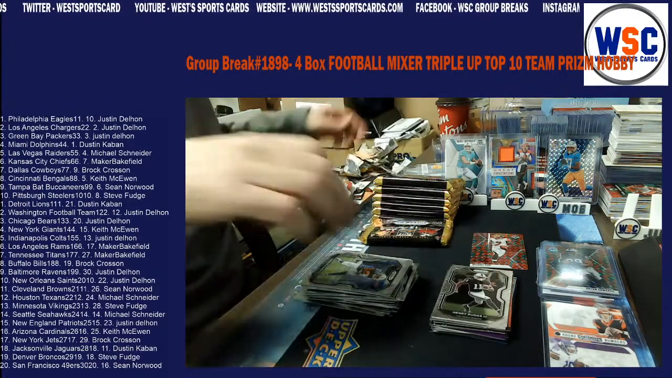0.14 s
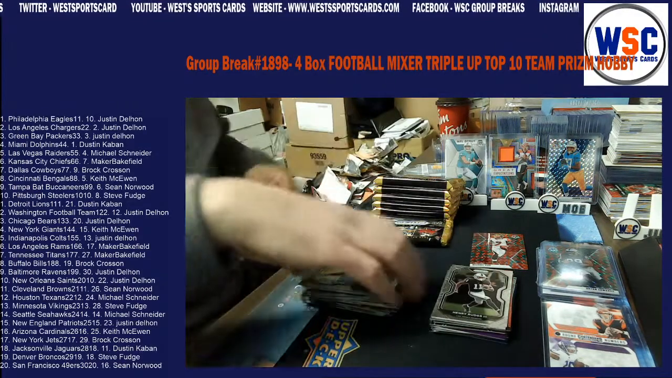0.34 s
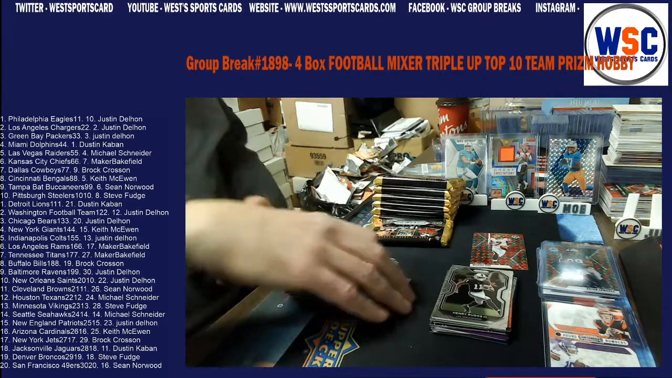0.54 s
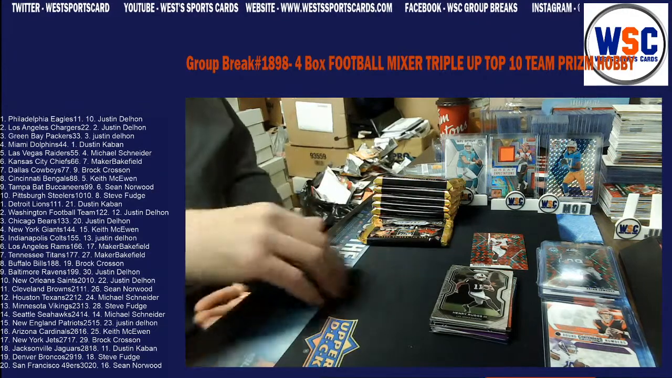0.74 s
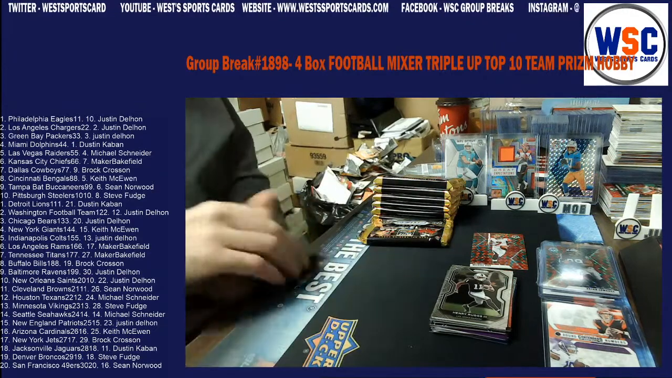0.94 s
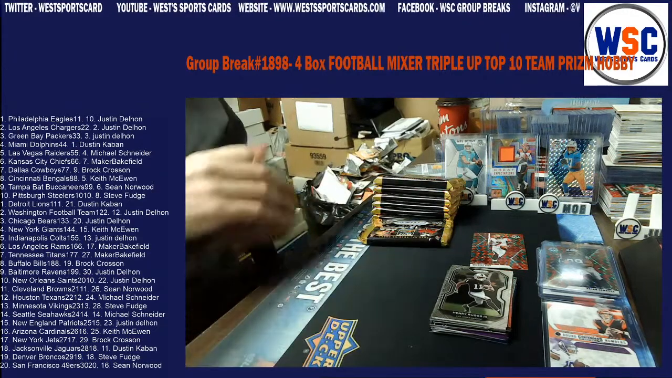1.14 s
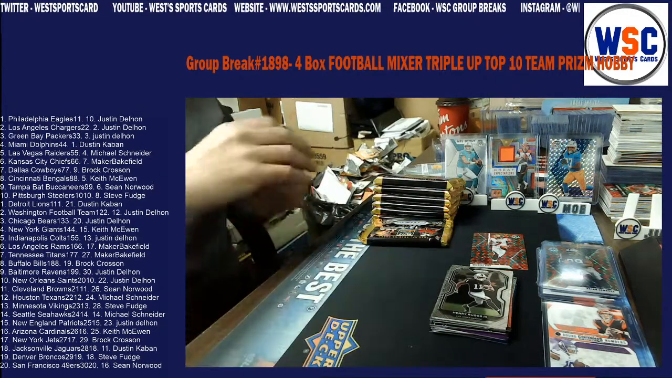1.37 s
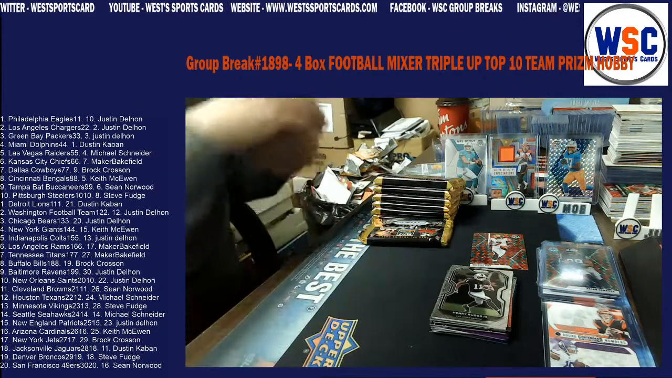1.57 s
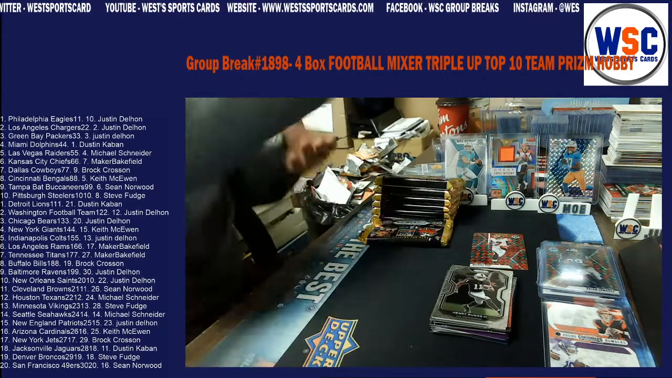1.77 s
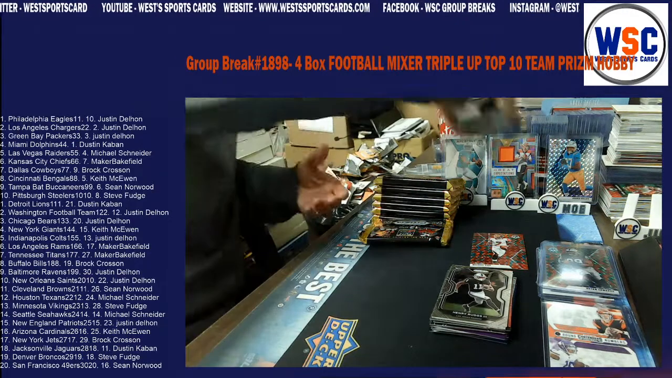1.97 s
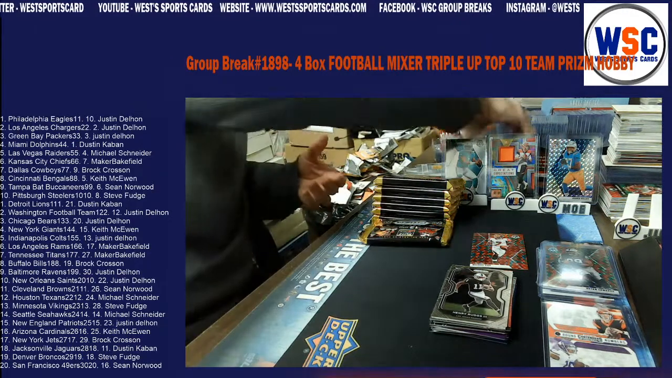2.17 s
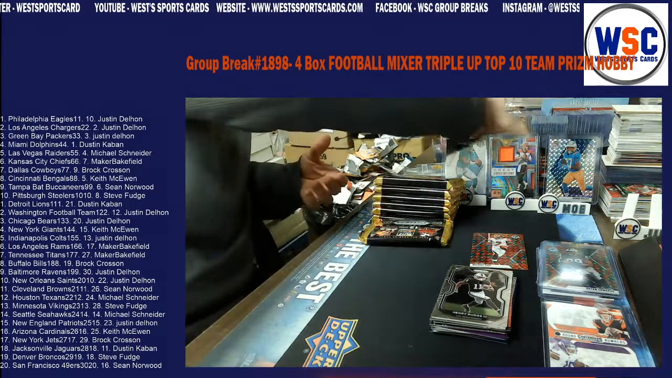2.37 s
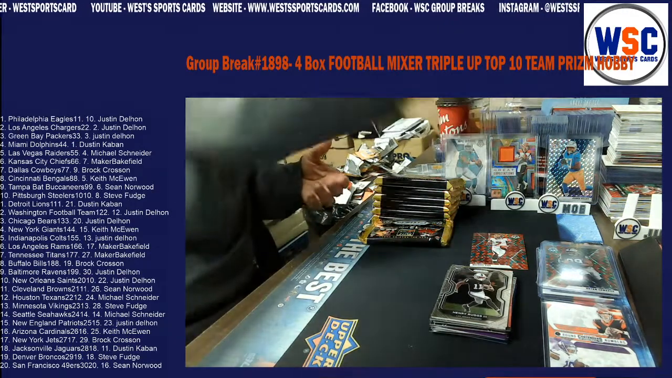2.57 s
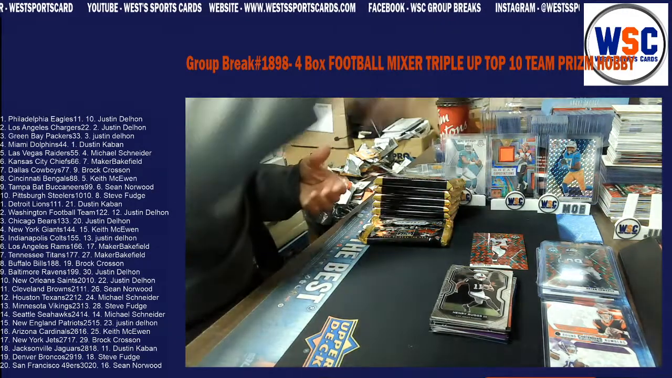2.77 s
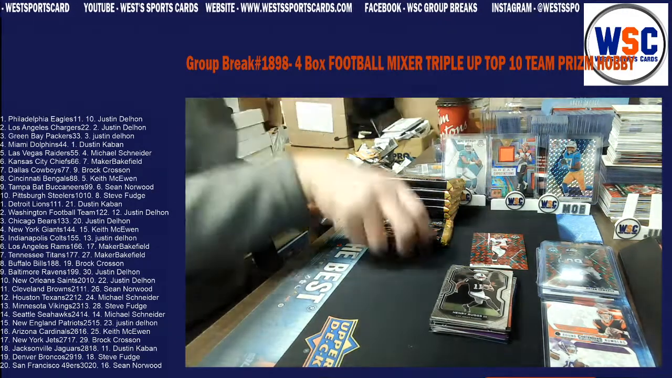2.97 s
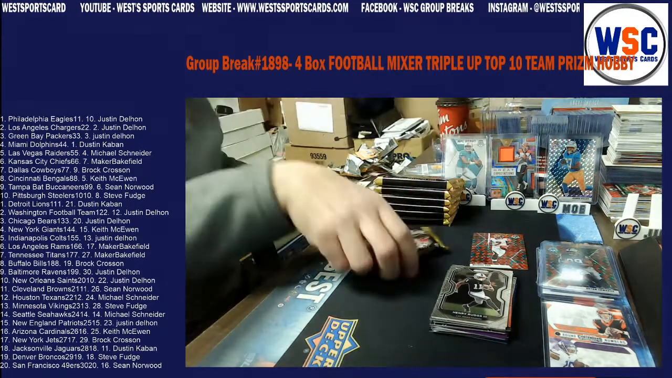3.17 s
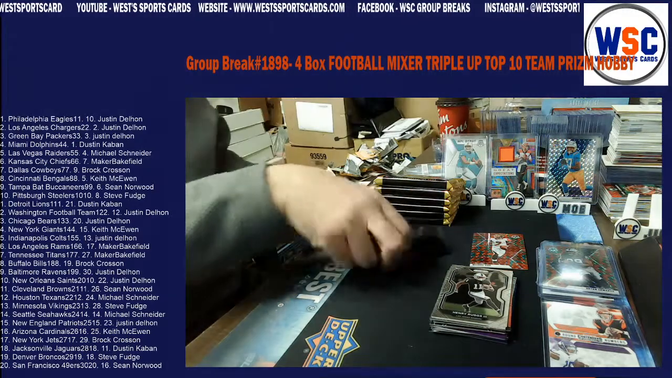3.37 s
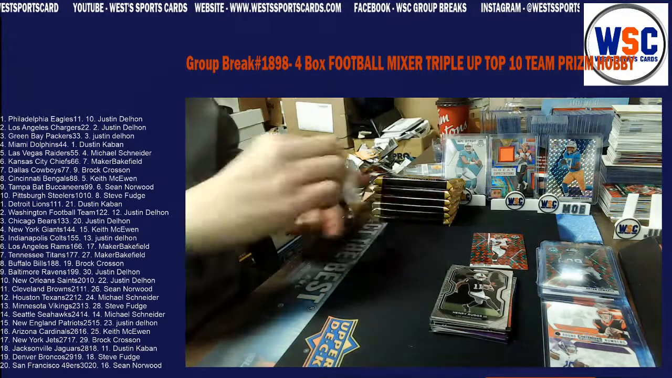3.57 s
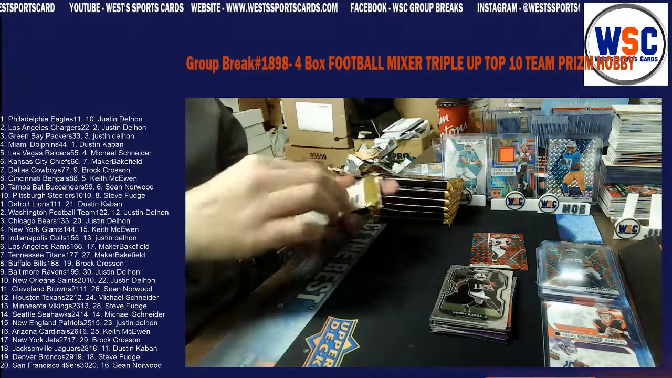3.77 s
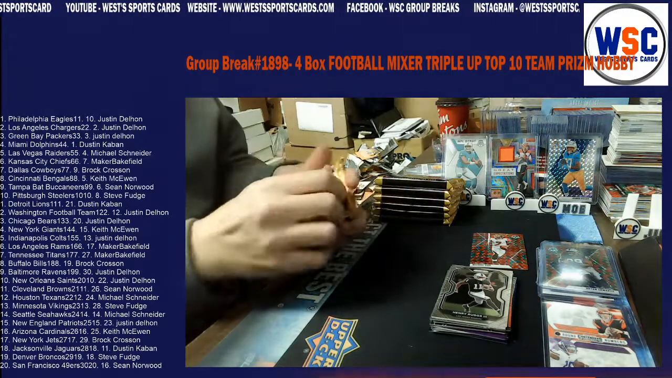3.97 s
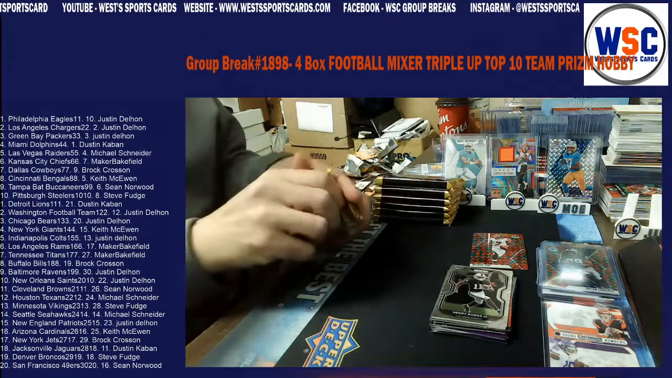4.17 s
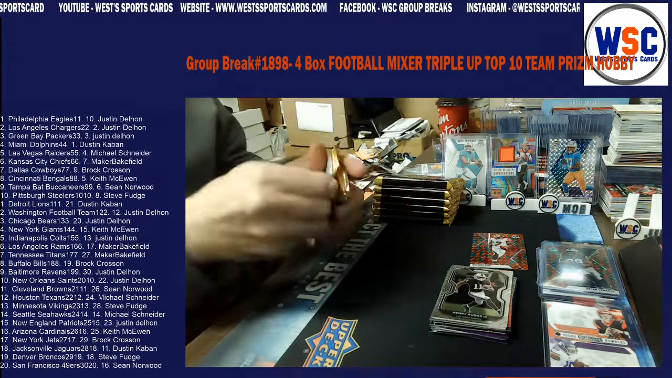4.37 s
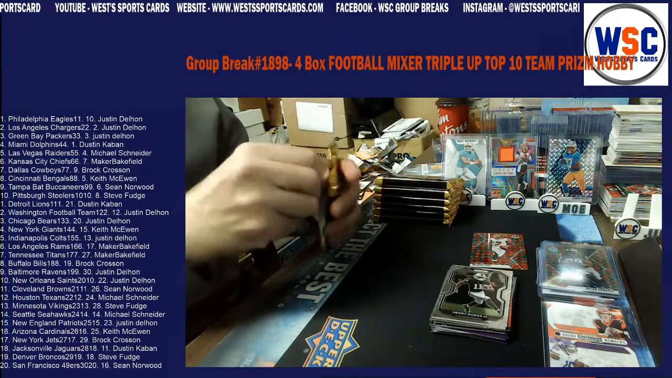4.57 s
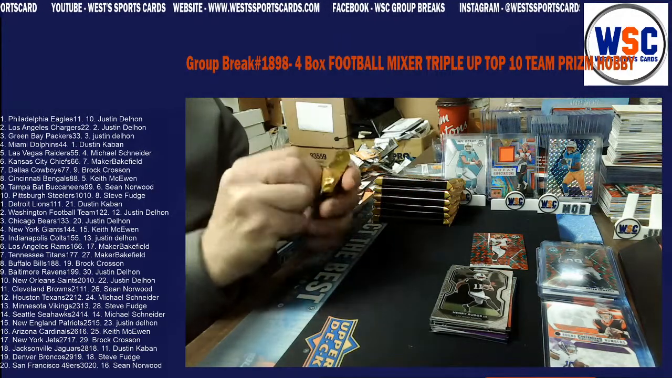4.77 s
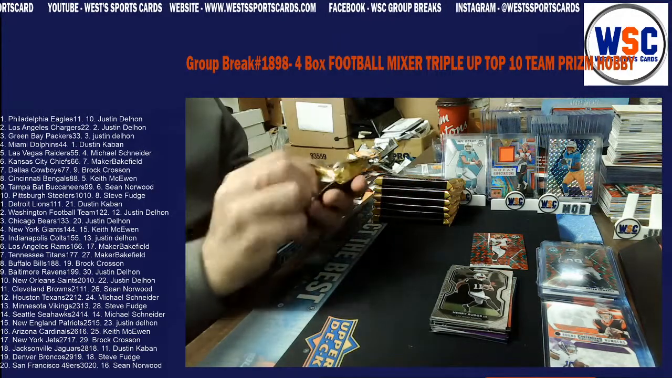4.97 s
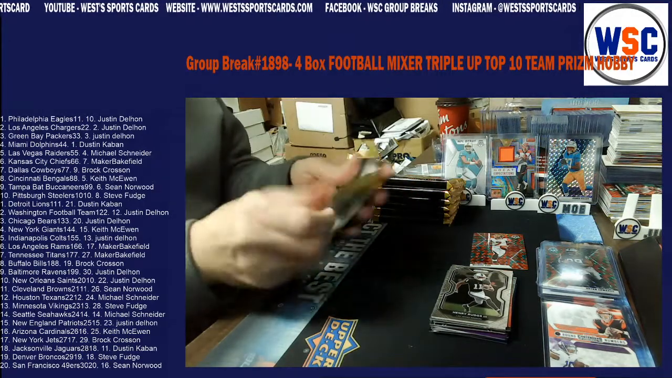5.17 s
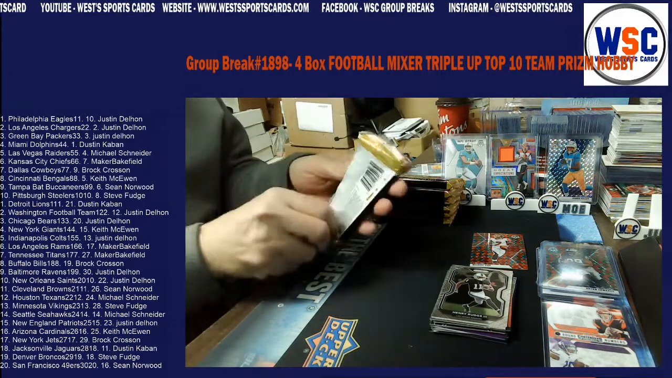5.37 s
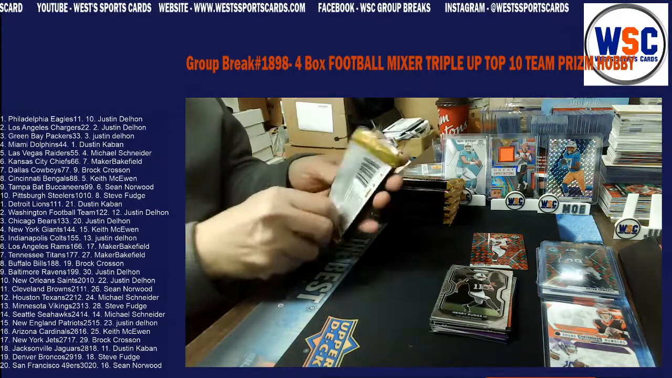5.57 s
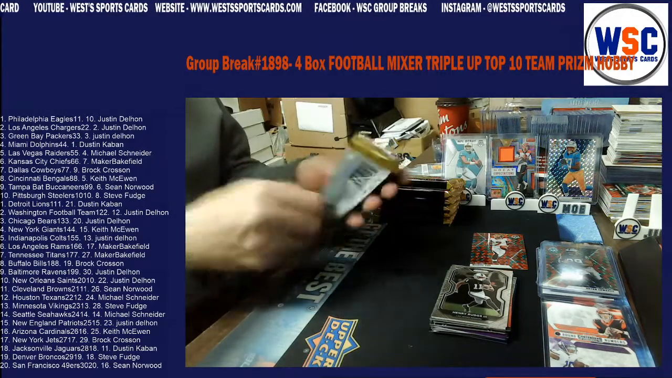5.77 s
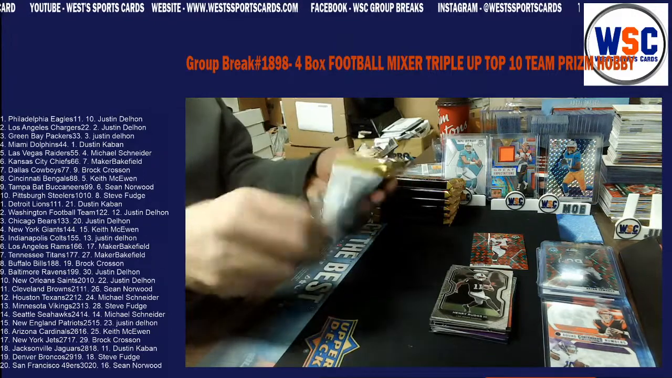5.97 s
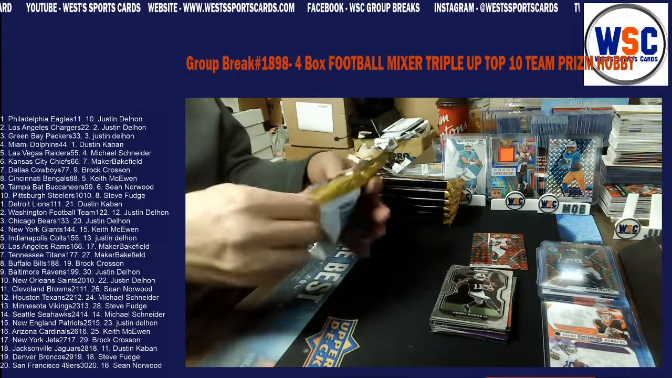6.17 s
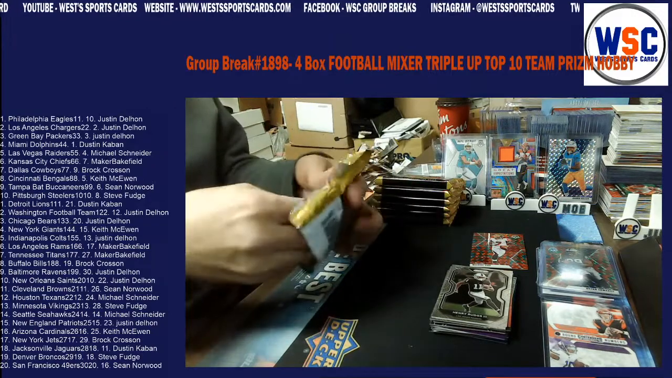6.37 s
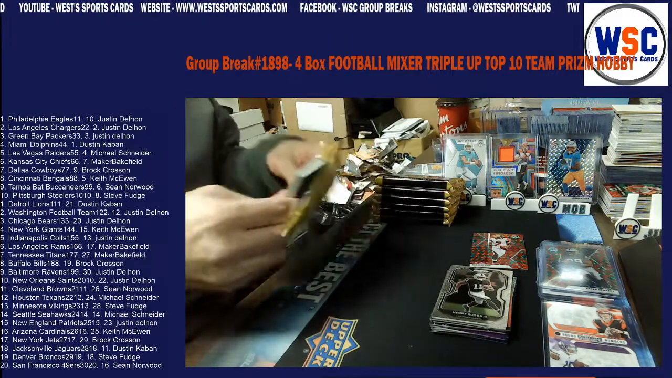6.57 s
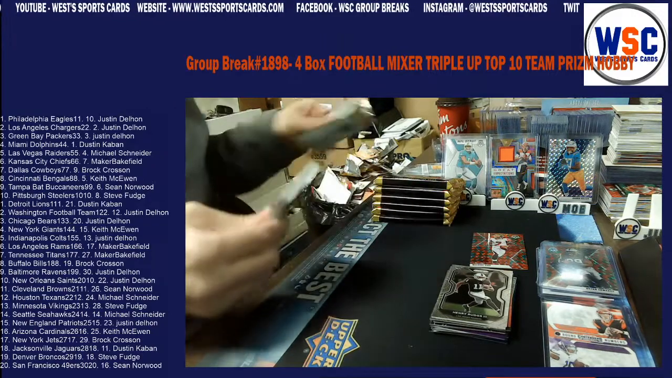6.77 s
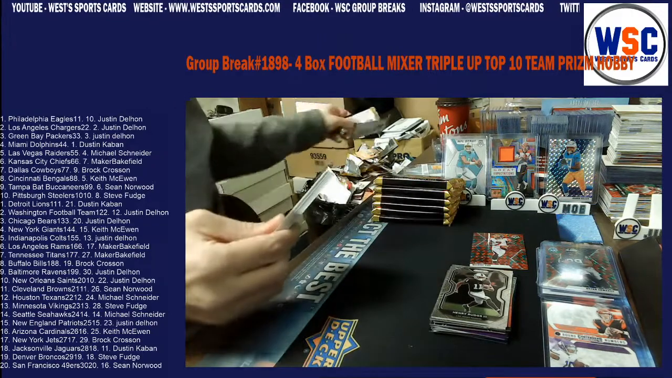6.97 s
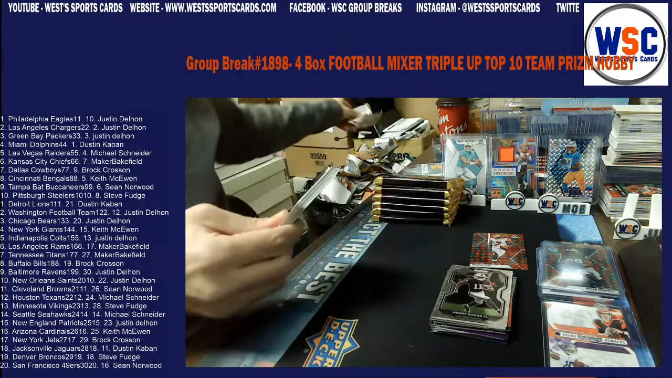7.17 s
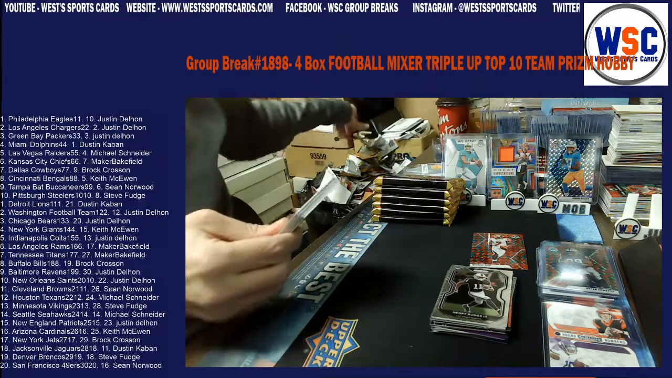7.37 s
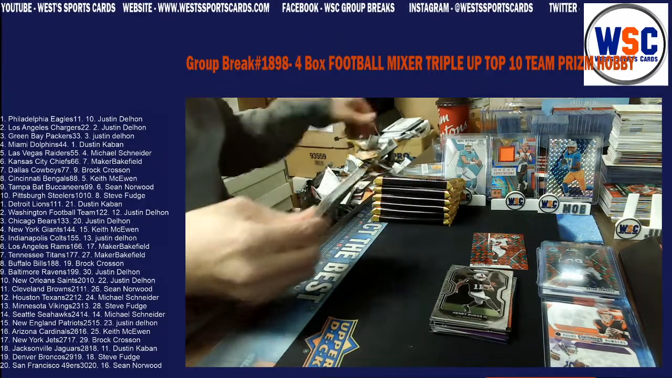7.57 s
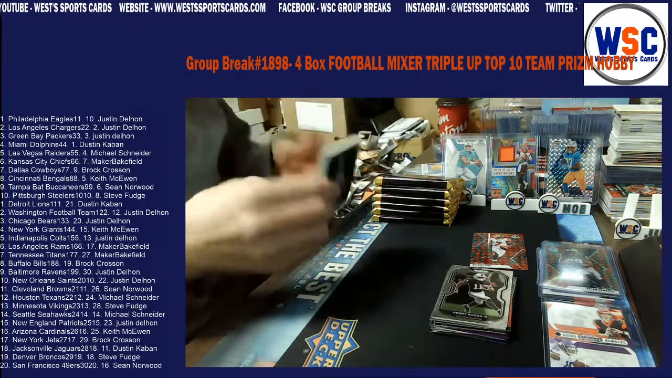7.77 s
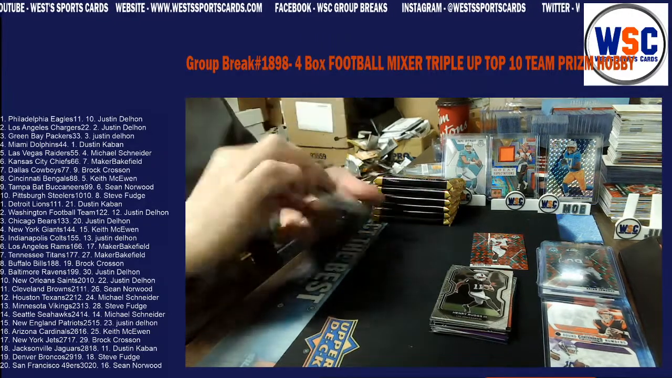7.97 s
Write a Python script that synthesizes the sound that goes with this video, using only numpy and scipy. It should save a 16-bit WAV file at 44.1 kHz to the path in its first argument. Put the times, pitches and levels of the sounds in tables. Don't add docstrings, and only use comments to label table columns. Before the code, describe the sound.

After a quiet start and one small thud, crisp foil crinkles, snaps and pops close by for several seconds, then fades to faint rustles over hum.

```python
import sys
import numpy as np
from scipy import signal
from scipy.fft import rfft, irfft
from scipy.io import wavfile

SR = 44100
rng = np.random.default_rng(int(sys.argv[2]) if len(sys.argv) > 2 else 0)


def transcribe(u):
    v = np.clip(np.atleast_2d(u).T, -1, 1)
    q = np.round(v * 32767).astype(np.int16)
    wavfile.write(sys.argv[1], SR, q)


def decibels_to_gain(level_db):
    exponent = np.asarray(level_db, float) / 20
    return 10 ** exponent


N = 353682


def rms_one(x):
    return x / np.sqrt(np.mean(x ** 2) + 1e-20)


def at_hz(points, hz):
    points = np.array(points)
    return np.interp(np.log(hz), np.log(points[:, 0]), points[:, 1])


def in_time(start_s, length_s, level_db, attack_s, release_t60_s):
    out, t = np.zeros(N), np.arange(N) / SR
    for start, hold, db in zip(start_s, length_s, level_db):
        span = slice(round(start * SR), round((start + hold + 1.5 * release_t60_s) * SR))
        swell = np.clip((t[span] - start) / attack_s, 0, 1) ** 2
        since_end = np.maximum(t[span] - start - hold, 0)
        out[span] += swell * decibels_to_gain(db - 60 * since_end / release_t60_s)
    return out


def wander(rate_hz):
    r = np.exp(-2 * np.pi * rate_hz / SR)
    return rms_one(signal.lfilter([1], [1, -2 * r, r * r], rng.standard_normal(N)))


def clicks(per_s, spread_db):
    sizes = decibels_to_gain(spread_db * np.minimum(rng.exponential(1, N), 3.0)) * rng.choice([-1, 1], N)
    return rms_one(sizes * (rng.random(N) < per_s / SR))


def causal_colour(spectrum):
    hz = np.maximum(np.fft.rfftfreq(2048, 1 / SR), 1)
    cepstrum = irfft(np.log(decibels_to_gain(at_hz(spectrum, hz))))
    cepstrum[1:1024] *= 2
    response = irfft(np.exp(rfft(cepstrum[:1024], 2048)))[:1024]
    return response / np.sqrt(np.sum(response ** 2))


# hz, level_db_per_hz
AIR = [(15, -37.5), (25, 6), (86, -1), (136, -15.5), (204, -19.5), (240, -26.5), (331, -35.5), (400, -30),
       (524, -28), (973, -36.5), (1270, -33), (1540, -39), (4050, -47), (7530, -43.5), (15600, -54)]
# centre_hz, width_hz, rms_db
FAN = [(17.44, 3.3, -40), (133.8, 11, -58), (345.5, 55, -61), (1259, 28, -74), (1076, 91, -74)]
# hz, share
LIKENESS = [(60, 0.98), (150, 0.9), (380, 0.83), (950, 0.33), (2380, 0.19), (5980, 0.18), (15000, 0.51)]
AIR_DB = -41.5


def room_hum():
    hz = np.maximum(np.fft.rfftfreq(N, 1 / SR), 1)
    mid, side = rfft(rng.standard_normal((2, N)))
    power = decibels_to_gain(at_hz(AIR, hz)) ** 2
    power *= decibels_to_gain(AIR_DB) ** 2 / np.mean(power)
    for centre_hz, width_hz, db in FAN:
        hump = 1 / (1 + (2 * (hz - centre_hz) / width_hz) ** 2) ** 2
        power += decibels_to_gain(db) ** 2 * hump / np.mean(hump)
    alike = np.clip(at_hz(LIKENESS, hz), 0, 1)
    pair = np.sqrt(1 + alike) * mid + np.sqrt(1 - alike) * side * np.array([[1], [-1]])
    return irfft(np.sqrt(power / (1 + alike)) * pair, N) * decibels_to_gain([[.4], [-.4]])


# start_s, length_s, rustle_db
BRUSH = [
    (.0, 0.58, -69),
    (0.484, 0.45, -60.5),
    (1.048, 0.4, -71.5),
    (1.6, 0.33, -74),
    (1.988, 0.4, -66.5),
    (6.693, 0.44, -67),
    (7.183, 0.1, -53.5),
    (7.605, 0.49, -68.5),
]
SWEEP_S, LIFT_T60_S = 0.097, 0.23


def brush_strength():
    return decibels_to_gain(-2.5) * in_time(*np.transpose(BRUSH), SWEEP_S, LIFT_T60_S)


# start_s, length_s, crinkle_db, body_db (relative to crinkle)
SQUEEZES = [(2.994, 0.072, -24.5, -12), (3.08, 0.096, -54, -42), (3.239, 0.1, -27, -5.5),
            (3.363, 0.058, -28, -9), (3.435, 0.054, -55, -13), (3.569, 0.053, -26.5, -8.5),
            (3.778, 0.058, -27, -9.5), (3.936, 0.033, -26.5, -15.5), (3.985, 0.16, -28, -12.5),
            (4.101, 0.096, -15, -15), (4.256, 0.11, -30.5, -13), (4.335, 0.032, -22.5, -12.5),
            (4.438, 0.11, -25, -14), (4.565, 0.16, -22, -15.5), (4.742, 0.039, -26, -20),
            (4.9, 0.065, -22.5, -10), (5.0, 0.18, -25, -11.5), (5.185, 0.085, -22, -10.5),
            (5.311, 0.044, -29.5, -13.5), (5.438, 0.077, -31.5, -11.5), (5.59, 0.13, -19.5, -20.5),
            (5.829, 0.18, -25.5, -9), (6.024, 0.083, -32, -5.5), (6.092, 0.037, -32.5, -3),
            (6.132, 0.15, -26.5, -14), (6.292, 0.068, -25.5, -12), (6.466, 0.098, -26.5, -9.5),
            (3.498, 0.027, -43, -5), (3.626, 0.066, -43, -13), (5.281, .03, -39, -10), (5.372, .06, -49, -7),
          (6.37, 0.027, -42.5, -5), (2.928, 0.069, -32.5, -5.5), (3.192, .035, -36, -3.5),
          (3.695, 0.07, -38.5, -7), (3.809, 0.12, -37.5, -8), (5.514, 0.056, -40, -9.5),
          (6.603, 0.071, -43.5, -6), (4.774, 0.092, -20.5, -11), (4.92, 0.047, -21.5, -11.5),
          (5.695, 0.086, -14, -9.5)]
PRESS_S, SETTLE_T60_S = 0.0094, 0.11


def grips():
    return np.transpose(sorted(map(tuple, SQUEEZES)))


def crinkle_strength(start_s, length_s, level_db, lumps):
    return in_time(start_s, length_s, level_db, PRESS_S, SETTLE_T60_S) * lumps


# start_s, peak_db, decay_t60_s, loudest_hz
PACK_CREASES = [(2.9976, -34, 0.15, 6580), (3.1, -13, 0.026, 5600), (3.2465, -33, 0.04, 6320),
                (3.272, -14, 0.022, 6200), (3.2889, -13, 0.024, 5940), (3.3074, -28, 0.045, 6040),
                (3.3286, -21.5, 0.018, 6150), (3.3615, -27.5, 0.081, 5010), (3.3912, -18.5, 0.051, 6530),
                (3.4104, -23, 0.066, 5700), (3.445, -16, 0.017, 6440), (3.4708, -15.5, 0.027, 7400),
                (3.488, -18.5, 0.037, 6000), (3.542, -34.5, 0.12, 5350), (3.5824, -20, 0.03, 6200),
                (3.6183, -16, 0.028, 4450), (3.716, -33.5, 0.067, 6910), (3.784, -9.5, 0.029, 6320),
                (3.8802, -31.5, 0.051, 5900), (3.913, -29, 0.027, 6710), (3.945, -28.5, 0.094, 6000),
                (3.9934, -19, 0.032, 5860), (4.0376, -28, 0.055, 4200), (4.0567, -31, 0.11, 6130),
                (4.1113, -23, 0.04, 6100), (4.1275, -20.5, 0.12, 6130), (4.164, -11.5, 0.059, 7150),
                (4.1874, -12.5, 0.039, 8100), (4.2353, -36, 0.021, 7180), (4.2662, -21, 0.023, 7500),
                (4.279, -22.5, 0.05, 6550), (4.3315, -33, 0.024, 6540), (4.3787, -15, 0.035, 6900),
        (4.402, -18, 0.032, 7550), (4.4424, -18, 0.028, 8260), (4.4645, -17.5, 0.026, 6070),
        (4.5017, -16.5, 0.029, 8500), (4.5266, -25, 0.09, 7040), (4.57, -15, 0.042, 7350),
        (4.5947, -17, 0.025, 5140), (4.6254, -11.5, 0.04, 6860), (4.6394, -7.5, 0.061, 6180),
        (4.6724, -14.5, 0.026, 5250), (4.6942, -9, 0.038, 5800), (4.7486, -25.5, 0.037, 7380),
        (4.771, -14, 0.038, 6710), (4.791, -7.5, 0.098, 6630), (4.907, -11, 0.081, 4650),
        (4.9352, -8, 0.1, 6400), (4.9509, -4, 0.027, 5870), (4.968, -4.5, 0.024, 5700),
        (4.9832, -7.5, 0.041, 6610), (5.0655, -19.5, 0.038, 5960), (5.1223, -21, 0.047, 7280),
        (5.1387, -13.5, 0.052, 5970), (5.21, -7.5, 0.039, 6230), (5.2318, -19, 0.028, 5250),
        (5.2595, -27.5, 0.019, 6140), (5.3198, -36, 0.048, 5560), (5.3674, -23.5, 0.029, 6230),
                (5.4661, -21.5, 0.035, 6900), (5.4869, -13, 0.022, 6520), (5.6087, -28, 0.094, 5990),
            (5.6393, -10, 0.029, 7100), (5.67, -14, 0.013, 6660), (5.6818, 0, 0.041, 8000),
            (5.7035, -10, 0.047, 5960), (5.7422, -15.5, 0.11, 6160), (5.7723, -6.5, 0.034, 6100),
            (5.8457, -18.5, 0.046, 6290), (5.8865, -5.5, 0.025, 6800), (5.911, -11.5, 0.015, 6870),
            (5.9224, -2, 0.026, 6810), (5.988, -26, 0.042, 6140), (6.0008, -22.5, 0.036, 6150),
            (6.0344, -22, 0.047, 5930), (6.0692, -19, 0.047, 5240), (6.11, -30, 0.022, 5430),
            (6.1566, -15, 0.044, 5400), (6.1794, -10.5, 0.036, 6760), (6.213, -17, 0.044, 6360),
            (6.2696, -29, 0.056, 6800), (6.3038, -2.5, 0.022, 7160), (6.334, -29, 0.032, 6670),
            (6.355, -18, 0.012, 6050), (6.4795, -27.5, 0.059, 5060), (6.4948, -22.5, 0.087, 6600),
            (6.5248, -26, 0.028, 6240), (6.5575, -25, 0.035, 8000), (6.6453, -37.5, 0.036, 6490)]
# start_s, peak_db, decay_t60_s, loudest_hz
TICKS = [(0.2803, -52, 0.076, 5420), (0.3596, -48, 0.063, 6880), (0.4084, -42.5, 0.1, 5040),
         (0.437, -42, 0.074, 4300), (0.9234, -59, 0.06, 7090), (1.1129, -53, 0.06, 7400),
         (1.2584, -56, 0.092, 6320), (1.3684, -57, 0.17, 5600), (1.3984, -58, 0.068, 3310),
         (2.7462, -54, 0.06, 4580), (2.8459, -50, 0.049, 4070), (6.935, -43.5, 0.071, 5140),
         (7.0638, -48, 0.052, 7680), (7.115, -45.5, 0.087, 5460), (7.237, -44, 0.16, 5340),
         (7.2908, -33.5, 0.05, 8590), (7.4145, -53.5, 0.042, 3170), (7.5484, -52, 0.052, 4610),
         (7.6814, -59, 0.06, 4880), (7.9122, -48.5, 0.076, 6970)]
# start_s, peak_db, decay_t60_s, loudest_hz
SLAPS = [
    (2.275, -38.5, 0.024, 3080),
    (2.2958, -24, 0.029, 3080),
    (2.3294, -55, 0.03, 5230),
]
# start_s, peak_db, decay_t60_s, loudest_hz, left_right_db
MORE_CREASES = [(0.2954, -51, 0.03, 5710, 1.0), (0.4964, -52, 0.03, 3230, 1.0), (3.2354, -29, 0.03, 6100, 1.0),
                (3.598, -20, 0.03, 6790, 1.5), (3.7304, -37, 0.03, 5410, 1), (4.749, -13, 0.028, 6700, -3),
                (4.8054, -8, 0.03, 6170, 2.5), (4.828, -16, 0.03, 6240, 0), (4.918, -13, 0.03, 7570, -1.5),
                (4.996, -18.5, 0.03, 6300, 3), (5.044, -21, 0.03, 5780, 1), (5.0908, -27, 0.03, 5970, 1),
                (5.2016, -8.5, 0.03, 6200, 1), (5.2744, -23, 0.03, 5290, -1.0), (5.3336, -22, 0.03, 5940, -3),
                (5.5662, -39.5, 0.03, 6140, 1.0), (5.6146, -16.5, 0.03, 6030, -3.5), (5.622, -9, 0.03, 7320, -2),
                (5.692, -4.5, 0.03, 7120, 0.5), (5.718, -8.5, 0.035, 5080, 1), (5.7643, -8, 0.03, 6370, -1),
                (5.8296, -21.5, 0.03, 6470, -0.5), (5.8706, -12, 0.024, 6550, 0.5), (6.515, -18, 0.03, 5060, 0.5),
                (6.568, -15, 0.035, 4610, 0), (6.5994, -36, 0.03, 6590, 1.0), (7.0874, -41, 0.028, 5540, 3)]
CREASES = PACK_CREASES
EDGES_HZ = 140 * 2 ** np.arange(0, 7, .4)
SKIN = np.clip(np.log2(EDGES_HZ[1:] / 2000), 0, 1)
SWELL_S = 0.0018
TICK_BODY_DB, SLAP_BODY_DB = -7, 11
FOCUS_DB = 7.0


def snap_strength(start_s, body_db):
    fine = np.array(MORE_CREASES)

    def held_body(times_s):
        return body_db[np.searchsorted(start_s, np.array(times_s) + .01) - 1]

    bodies_db = [*held_body([row[0] for row in CREASES]), *[TICK_BODY_DB] * len(TICKS),
                 *[SLAP_BODY_DB] * len(SLAPS)]
    pans = [*rng.standard_normal(len(bodies_db)), *fine[:, 4] / 6]
    bodies_db = np.array([*bodies_db, *held_body(fine[:, 0])]) + 15.5
    events = [*CREASES, *TICKS, *SLAPS, *fine[:, :4] - [0, 2, 0, -1]]

    hz = np.sqrt(EDGES_HZ[1:] * EDGES_HZ[:-1])
    shapes = np.zeros((2, len(hz), N + 4000), "f4")
    t = np.arange(4000) / SR
    for (start, db, t60_s, top_hz), under_db, pan in zip(events, bodies_db, pans):
        at = max(round((start - SWELL_S) * SR), 0)
        side = decibels_to_gain(db + 2.84 * pan * np.array([1, -1]))[:, None, None]
        skin_db = FOCUS_DB * (np.abs(np.log2(hz / 6500)) - np.abs(np.log2(hz / top_hz)))
        patch = decibels_to_gain((1 - SKIN) * under_db + SKIN * skin_db)
        fade = np.minimum(t / SWELL_S, 1) * decibels_to_gain(-60 * t / max(t60_s, .01))
        shapes[:, :, at:at + 4000] += side * patch[:, None] * fade
    return shapes[..., :N]


GIVE_S, GIVE_DB = 0.0014, 14


def foil_clicks():
    shared = clicks(5000, spread_db=5.5)
    give = ((np.array([row[0] for row in [*CREASES, *MORE_CREASES]]) + GIVE_S) * SR).astype(int)
    shared[give] = decibels_to_gain(GIVE_DB)
    shared = np.array([np.roll(shared, 1), shared])
    own = np.array([clicks(7000, spread_db=6.0) for side in range(2)])
    own[0, give + 5] = decibels_to_gain(GIVE_DB)
    own[1, give + 9] = -decibels_to_gain(GIVE_DB)
    return shared, own


# hz, level_db_per_hz
FOIL = [(150, -57), (250, -27.5), (450, -21), (720, -16), (914, -18.5), (1090, -13), (1410, -16.5),
        (6340, 5.5), (9110, -3), (15600, -34.5)]


def foil():
    start_s, length_s, effort_db, body_db = grips()
    snaps = snap_strength(start_s, body_db)
    lumps = decibels_to_gain(2.68 * wander(57))
    crinkle = crinkle_strength(start_s, length_s, effort_db - 18.5, lumps)
    heave = crinkle_strength(start_s, length_s, effort_db + body_db + 2.5, lumps)
    brush = brush_strength()
    shared, own = foil_clicks()
    out = np.zeros((2, N))
    for k, (low_hz, high_hz) in enumerate(zip(EDGES_HZ, EDGES_HZ[1:])):
        alike = 1 / (1 + (high_hz / 2400) ** 4.3) * .55 + .45
        drive = np.sqrt(alike) * shared + np.sqrt(1 - alike) * own
        under = heave ** (1 - SKIN[k]) * crinkle ** SKIN[k]
        under *= decibels_to_gain((2.0 + 1.7 * SKIN[k]) * wander(19.7))
        under += brush * decibels_to_gain(0.73 * np.log2(high_hz / 8000) + 0.5 * wander(12))
        band = signal.butter(2, [low_hz, high_hz], "band", fs=SR, output="sos")
        strength = decibels_to_gain(-8.0) * snaps[:, k] + under
        out += (-1) ** k * signal.sosfilt(band, drive * strength + 1e-18)
    shaded = signal.lfilter([1, .35], [1.35], out[0])
    return signal.oaconvolve([shaded, out[1]], causal_colour(FOIL)[None], axes=1)[:, :N]


# start_s, length_s, pitch_hz, level_db
SQUEAKS = [
    (0.125, .05, 5500, -67),
    (0.15, .04, 9400, -68),
    (6.72, 0.18, 3500, -76),
    (6.826, 0.11, 7050, -73),
    (6.92, 0.19, 3420, -74),
    (7.168, .06, 5600, -73),
    (7.303, .04, 8540, -55.5),
    (7.34, .03, 6250, -69),
]


def squeaks():
    out, t = np.zeros(N), np.arange(N) / SR
    waver = 1.5 * np.sin(2 * np.pi * 35 * t)
    for start_s, length_s, pitch_hz, db in SQUEAKS:
        through = np.clip((t - start_s) / length_s, 0, 1)
        out += decibels_to_gain(db) * np.sin(np.pi * through) * np.sin(2 * np.pi * pitch_hz * t + waver)
    return out


def ring(push, hz, t60_s):
    r, w = decibels_to_gain(-60 / (t60_s * SR)), 2 * np.pi * hz / SR
    return signal.lfilter([0, np.sin(w)], [1, -2 * r * np.cos(w), r * r], push + 1e-18)


# start_s, level_db, contact_s, push_to_roughness
THUDS = [(0.618, -72.5, 0.044, .1), (0.637, -64.5, 0.032, 0.12), (0.665, -64.5, 0.02, 0.18),
         (0.676, -71, 0.011, 0.9), (0.696, -74, .01, 1.5), (2.28, -73, .004, 0.57),
         (2.291, -51, 0.0091, 0.54), (2.296, -53, 0.0032, 0.52), (2.301, -46, 0.0027, 1.76),
         (2.307, -62, 0.0035, 1.3), (2.949, -65, 0.0096, 0.23), (5.738, -58, 0.014, 0.18),
         (5.768, -53, 0.0095, .2), (5.915, -54, 0.0053, 0.4), (6.179, -61.5, 0.014, 0.47)]
# pitch_hz, level_db, decay_t60_s
TABLE = [(59, -2.5, 0.13), (110, -8.5, 0.072), (180, 2.5, 0.028), (317, -7.5, 0.045), (508, 3, 0.013),
         (758, -0.5, 0.024), (1220, 12.5, 0.0017), (1820, 7.5, 0.0017), (3120, -1, 0.0016)]


def thuds():
    out, grit = np.zeros(N), rng.standard_normal((len(TABLE), N))
    rough, steady = np.zeros((2, N))
    for start_s, db, contact_s, weight in THUDS:
        at = round(start_s * SR)
        t = np.arange(round(3 * contact_s * SR)) / SR
        push = decibels_to_gain(db) * np.exp(-2 * t / contact_s)
        rough[at:at + len(t)] += push
        steady[at:at + len(t)] += weight * decibels_to_gain(-8.5) * push
    for (hz, db, t60_s), noise in zip(TABLE, grit):
        out += decibels_to_gain(db) * ring(rough * noise + steady, hz, t60_s)
    return signal.sosfilt(signal.butter(2, [70, 4500], "band", fs=SR, output="sos"), out)


# start_s, peak_db, pitch_hz
POPS = [(3.246, -20.5, 1760), (3.306, -19, 1140), (3.581, -24.5, 1030), (3.783, -47, 2330),
        (4.058, -16.5, 2000), (4.374, -25, 710), (4.402, -16.5, 1830), (4.441, -35, 2500),
        (4.571, -10, 2500), (4.631, -12.5, 2070), (4.693, -26.5, 1990), (4.728, -29.5, 2380),
        (4.793, -8, 1950), (4.861, -11.5, 2260), (4.907, -7, 2430), (5.366, -22.5, 2400),
        (5.773, -8.5, 1080), (5.847, -17.5, 2100), (5.888, -36, 1710), (5.921, -20, 1020),
        (6.035, -21, 1740), (6.069, -16.5, 2170), (6.18, -24.5, 1040), (6.303, -14.5, 1980),
        (0.626, -32, 1300), (0.632, -37, 780), (0.644, -30.5, 800), (2.2755, -38, 2050),
          (0.655, -44, 620), (3.289, -30, 1150), (3.785, -38, 730), (4.115, -36, 820), (4.48, -33, 724),
          (4.643, -7.5, 6520), (4.773, -33, 677), (4.905, -21, 793), (4.935, -21, 1090),
          (4.949, -19.5, 689), (4.975, -21.5, 1066), (4.92, -27, 880), (4.962, -24, 680), (4.985, -28, 458),
          (5.14, -31, 700), (5.217, -31, 760), (5.62, -38, 830), (5.683, 0, 7840), (5.683, 1.5, 8940),
          (5.686, -26.5, 498), (5.718, -22.5, 1070), (5.744, -26, 720), (5.777, -25, 520),
          (5.92, -30.5, 330), (6.04, -28, 510), (6.19, -11.5, 6600), (6.191, -30, 380), (6.22, -17.5, 6400),
          (6.304, -34, 740), (6.495, -31.5, 1030), (6.512, -24.5, 970), (6.614, -31, 2420),
          (6.646, -27, 2100), (7.292, -26, 8700), (7.296, -34, 8460), (7.112, -38, 2020)]


def pops():
    out, t = np.zeros(N + 2000), np.arange(2000) / SR
    for start_s, db, hz in POPS:
        at = round(start_s * SR)
        tone = np.sin(2 * np.pi * hz * t) + 0.2 * np.sin(2 * np.pi * 2.0 * hz * t)
        out[at:at + 2000] += decibels_to_gain(db - 6 - 60 * t * hz / 14) * tone
    return signal.sosfilt(signal.butter(2, 10500, fs=SR, output="sos"), out[:N])


PATTERN_S = .045


def nearby_echoes(x, near_db, near_t60_s, room_db, room_t60_s, split_hz, count):
    t = np.arange(round(.15 * SR)) / SR
    low, high = (signal.butter(1, split_hz, kind, fs=SR) for kind in ("low", "high"))
    fade = decibels_to_gain(near_db - 60 * t / near_t60_s) + decibels_to_gain(room_db - 60 * t / room_t60_s)
    pattern, out = np.arange(N) / SR / PATTERN_S % count, x.copy()
    for k, (shared, *own) in enumerate(rng.standard_normal((count, 3, len(t)))):
        paths = (signal.lfilter(*low, shared) + signal.lfilter(*high, own)) * fade
        distance = np.abs((pattern - k + count / 2) % count - count / 2)
        share = np.maximum(1 - distance, 0)
        out += signal.oaconvolve(x * np.sqrt(share), paths, axes=1)[:, :N]
    return out


def later_left(x):
    return np.array([np.roll(x[0], 3), x[1]])


def scene():
    hands = later_left(foil()) + pops() + squeaks() + thuds() * decibels_to_gain([[1.2], [-1.2]])
    hands = nearby_echoes(hands, near_db=-19.0, near_t60_s=0.0081, room_db=-30.5, room_t60_s=0.082,
                          split_hz=5540, count=7)
    return hands + later_left(room_hum())


def band_limit(x):
    return signal.sosfilt(signal.butter(12, 15720, fs=SR, output="sos"), x)


OFFSET = [
    [-.017],
    [-.031],
]
TREBLE_BLEND = .14
CUTOFF_HZ = 16000


def record(dry):
    treble = signal.butter(1, 1500, "high", fs=SR)
    dry = dry + TREBLE_BLEND * signal.lfilter(*treble, dry[::-1] - dry)
    rounded = dry / (1 + (dry / .95) ** 4) ** .25
    lowpass = signal.cheby2(14, 40, CUTOFF_HZ, fs=SR, output="sos")
    mix = signal.sosfilt(lowpass, rounded) + OFFSET
    return band_limit(mix)


dry = scene()
out = record(dry)
transcribe(out)
```